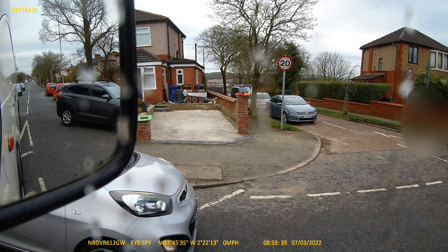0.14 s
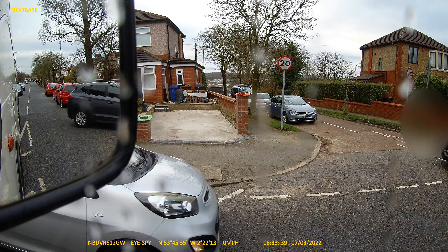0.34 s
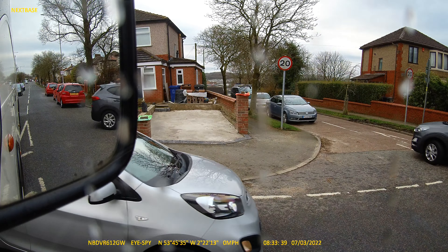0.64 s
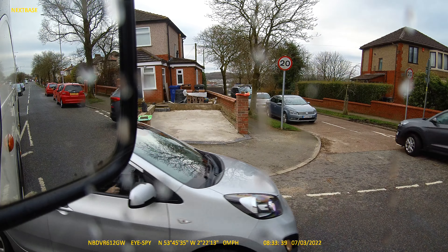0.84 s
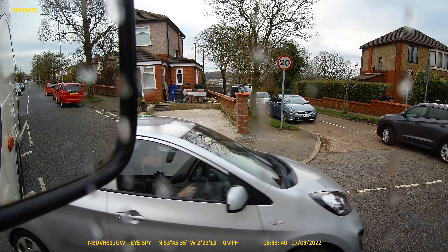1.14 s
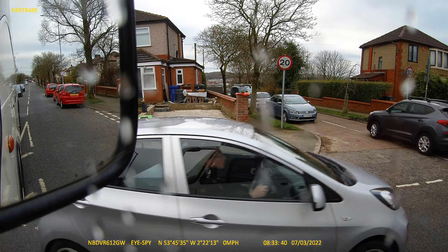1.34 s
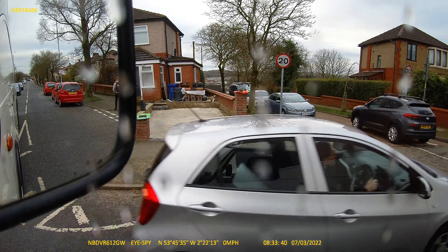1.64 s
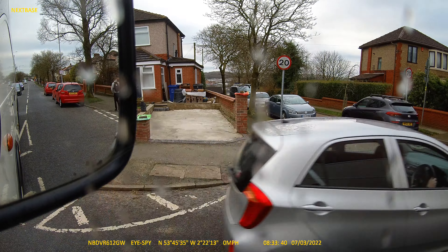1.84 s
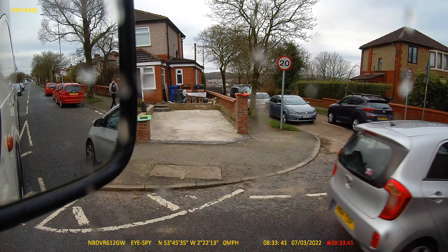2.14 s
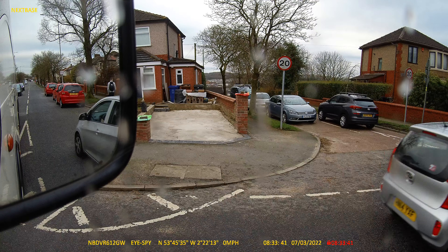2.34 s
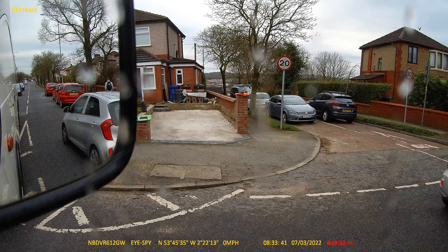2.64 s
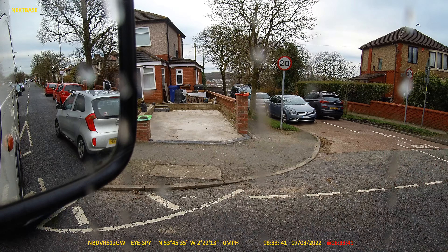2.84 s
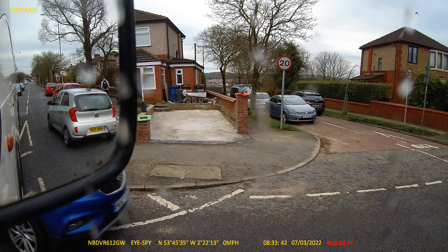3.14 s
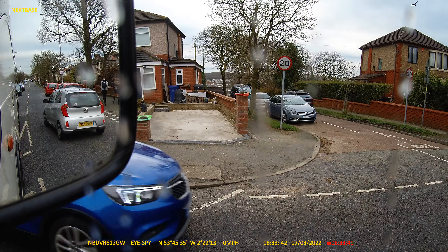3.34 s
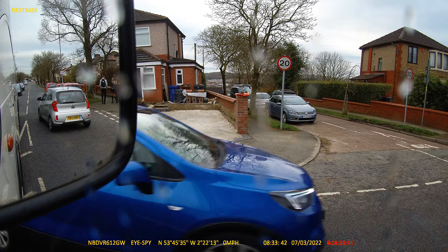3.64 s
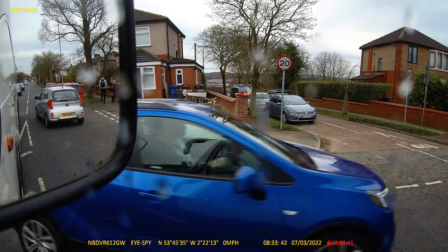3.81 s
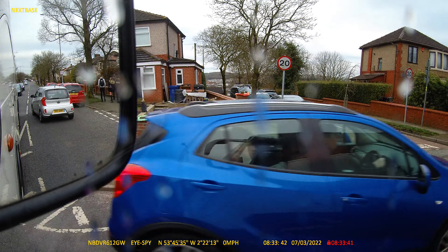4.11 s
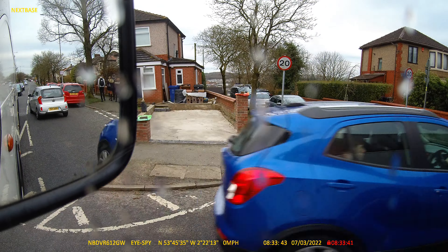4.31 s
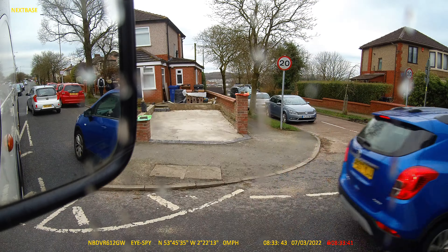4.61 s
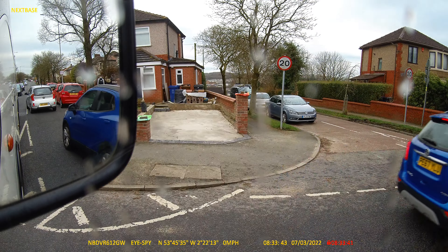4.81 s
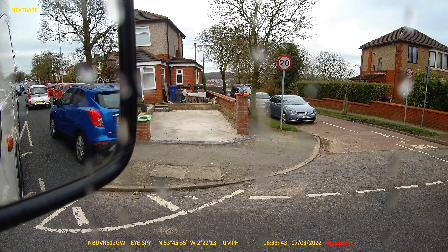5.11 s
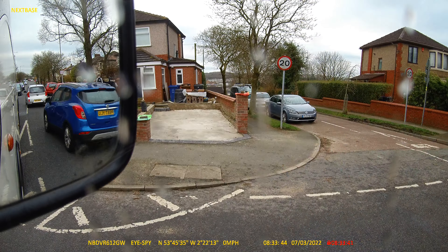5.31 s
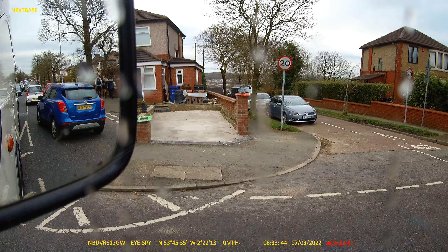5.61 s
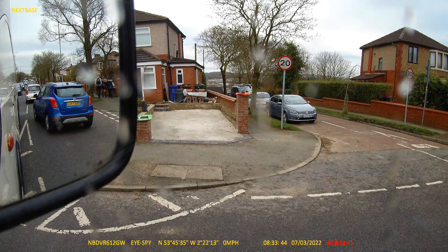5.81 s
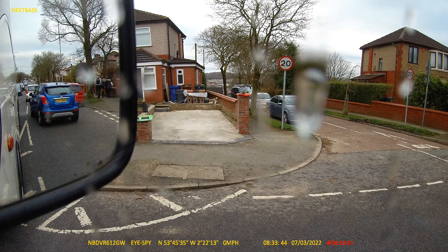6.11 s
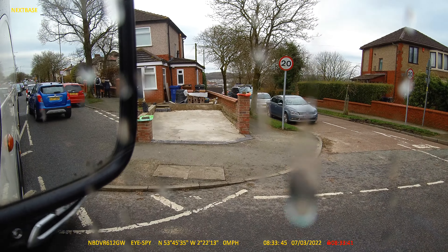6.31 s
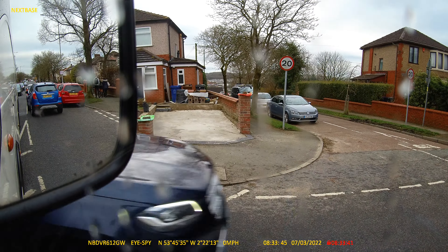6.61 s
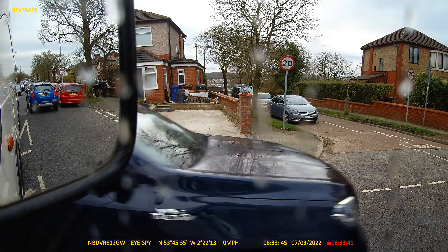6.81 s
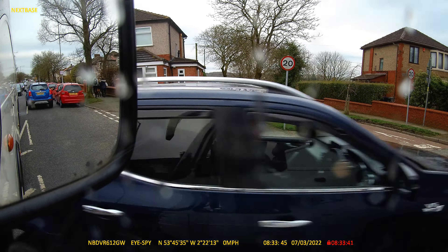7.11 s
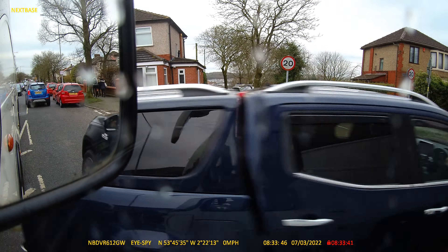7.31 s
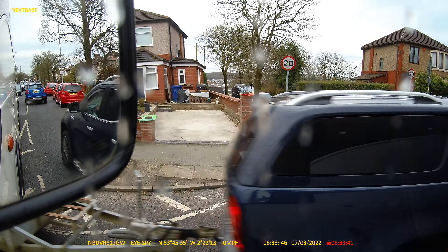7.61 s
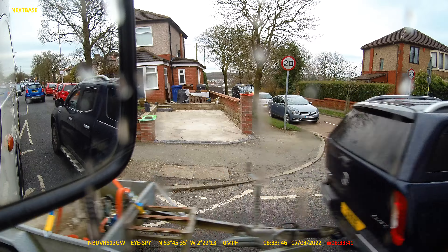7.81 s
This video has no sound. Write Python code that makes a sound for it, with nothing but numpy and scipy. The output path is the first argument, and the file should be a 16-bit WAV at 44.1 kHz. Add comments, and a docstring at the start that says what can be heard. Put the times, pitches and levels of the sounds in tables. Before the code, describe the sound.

Mono sound from a windscreen microphone inside a large diesel coach waiting at a junction. Throughout, a deep boom near 30 Hz and its 60 Hz overtone dominate, with unsteady low body shudder, a weaker hum around 330 Hz, and much quieter heater-blower rush, fine vent hiss and a faint wavering whistle near 1400 Hz. Tiny trim ticks fall at about 1.0 and 1.5 s, with a duller knock at 1.7 s. From 2.5 to 3.1 s a car's low exhaust hum glides upward and fades. At 4.7 s load comes on: the engine sags to about 28 Hz by 5.5 s, booming louder, and loose trim buzzes faintly around 5.75 s. It recovers after 6 s, overshoots to nearly 33 Hz at 7.3 s while the boom softens, then settles slightly above idle and strengthens. Around 7.6 s another car hums faintly, a rolling trailer swells the low noise, and one tiny rising squeak sounds.

```python
"""Idling diesel coach cab

Inside a large six-cylinder coach at a junction: multiples of the firing rate boom over noise-band body shudder;
the speed sags under load, recovers and overshoots. Heater-blower noise rushes through cab resonances, with a
faint sine whistle. Cars hum past as gliding sines and a trailer squeaks. Trim ticks ring damped panel modes;
trim also buzzes once a firing while the engine labours."""
import sys
import numpy as np
from scipy import signal
from scipy.fft import rfft, irfft, next_fast_len
from scipy.io import wavfile
from scipy.ndimage import uniform_filter1d, map_coordinates

SR = 44100
rng = np.random.default_rng(int(sys.argv[2]) if len(sys.argv) > 2 else 0)


def volts(x):
    """Linear amplitude factor 10**(x/20) for a level x in dB, scalar or array-like."""
    e = np.asarray(x, float) / 20
    return 10 ** e


def output_pcm(signal):
    """Save a mono or channel-first signal as 16-bit PCM at the path in sys.argv[1].

    Samples are clipped to [-1, 1] before scaling.
    """
    pcm = np.clip(np.atleast_2d(signal).T, -1, 1) * 32767
    wavfile.write(sys.argv[1], SR, np.round(pcm).astype(np.int16))


N = 350595

# engine speed: t/s, firing rate/Hz
SPEED = [(0.0, 29.99), (4.0, 29.955), (4.5, 30.02), (4.9, 29.6), (5.2, 28.38), (5.5, 27.97), (5.8, 28.13),
         (6.1, 29.36), (6.4, 29.58), (6.7, 30.36), (7.0, 30.95), (7.3, 32.69), (7.6, 31.13), (7.95, 31.07)]
# firing tone, louder in labour, softer in overrun: t/s, rms level/dB
FIRING = [(0, -22), (.6, -23.5), (3.2, -23.5), (4.3, -22.5), (5.3, -20), (6.35, -20.3), (6.8, -24),
          (7.48, -29.5), (7.85, -23)]
# upper tones, third row a belt-driven pump: multiple of firing rate, lag/cycles of it, unsteadiness/dB
MULTIPLES = [(2, .13, 1), (3, 0, 2), (3.91, 0, 3)]
# same rows: rms level at rest/dB, gain under load/dB, loss per Hz of speed sag/dB
MULTIPLE_LEVELS = [(-35, 2.5, 2), (-53.5, 6.5, 1), (-49.5, 7.5, 1)]
# body shudder spectrum: f/Hz, relative level per Hz/dB
SHUDDER = [(6, -14), (12, -26), (20, -21), (38, -3), (50, 1), (62, -0.5), (73, 1), (80, -2.5), (86, -8),
           (100, -22), (130, -25)]
# trailer rolling close by: t/s, half-length/s, road-noise swell/dB, shudder swell/dB
TRAILER = (7.68, 0.21, 4, 3.5)
# cab resonances: f/Hz, width/Hz, level per Hz/dB
CAB = [(94, 20, -60), (117.4, 25, -57), (153.2, 33, -57), (176.4, 32, -59), (215.9, 34.7, -55),
       (272, 36, -57.5), (294.5, 47, -57), (343, 43, -70), (366, 23, -65), (418.4, 50, -61),
       (461.6, 25, -59.5), (498, 22, -68.5), (526.3, 38, -63.5), (554, 34.4, -63.5), (587, 16, -73.5),
       (620.7, 44, -68), (645, 48, -71), (724, 69, -75), (781.6, 45, -67), (822, 45, -70), (869.5, 21, -73),
       (903, 27, -76.5), (948, 29, -77), (992, 55, -75.5), (1050, 54, -81.5)]
# windscreen and dashboard resonances: f/Hz, width/Hz, level per Hz/dB
DASH = [(1090, 100, -81), (1148, 44, -74.5), (1226, 88, -79), (1250, 32, -74), (1307, 20, -81),
        (1349, 29, -73), (1387.4, 46, -66), (1423, 44, -71), (1468, 28, -70.5), (1503, 44, -77.5),
        (1533, 27, -74.5), (1584, 42, -82.5), (1610, 25, -79.5), (1663, 37, -86), (1716, 93, -85),
        (1763, 78, -81.5), (1835, 70, -82.5), (1900, 120, -88.5), (2016, 54, -88.5), (2063, 30, -90.5),
        (2116, 31, -88), (2190, 67, -90.5), (2290, 43, -93.5), (2352, 25, -89), (2397, 25, -92),
        (2470, 37, -96), (2550, 36, -84), (2603, 40, -87)]
# vent duct resonances: f/Hz, width/Hz, level per Hz before ripple/dB
VENT = [(2697, 43, -83.5), (2840, 260, -89.5), (3130, 210, -91.5), (3260, 72, -89), (3427, 160, -92.5),
        (3560, 257, -99.5), (3780, 190, -93), (3870, 299, -100), (3970, 210, -96), (4160, 89, -91.5),
        (4290, 120, -93.5), (4500, 142, -99), (4614, 78, -89.5), (4680, 52, -91), (4850, 190, -93),
        (4995, 105, -94), (5050, 61, -94), (5170, 85, -91.5), (5320, 200, -95), (5532, 57, -99),
        (5680, 262, -93.5), (5900, 98, -101), (6050, 170, -96), (6240, 67, -92), (6430, 269, -98),
        (6542, 37, -90.5), (6670, 160, -91.5), (6830, 71, -98.5), (6960, 198, -99)]
# vent grille resonances: f/Hz, width/Hz, level per Hz before ripple/dB
GRILLE = [(7460, 790, -101), (7970, 238, -103), (8230, 240, -97), (8521, 129, -102), (8757, 70, -103),
          (9105, 650, -102), (9899, 120, -101), (10100, 160, -101), (10840, 620, -106), (11504, 66, -106),
          (11700, 76, -105), (12600, 370, -104), (12851, 301, -107), (14368, 198, -108)]
# trim panel modes: f/Hz, t60/s, relative level/dB
TRIM_MODES = [(1950, .01, 0), (2350, .007, -3), (3200, .004, -7), (4600, .008, 0), (5600, .004, -5),
              (6600, .005, -2), (8000, .005, 0), (9800, .004, 0), (11500, .003, -2), (13500, .003, -3)]
# trim ticks: t/s, nominal level of strongest mode/dB, centre f/Hz, spread/octaves
TICKS = [(.960, -43, 8500, .55), (.964, -44, 9500, .6), (.9868, -41, 6500, .6), (1.4625, -41, 8800, 1.2),
         (1.510, -33, 3200, 1.05), (1.7012, -30, 2050, .22)]
# exhaust hum of cars pulling away alongside: start t/s, length/s, from f/Hz, to f/Hz, rms level before fade/dB
CARS = [(2.54, .58, 60.5, 72, -26), (7.6, .7, 70.5, 73.5, -31)]
# trim buzz: peak t/s, half-length/s, nominal level of its bright clicks/dB
BUZZ = (5.75, .26, -50)
# trailer squeak: start t/s, length/s, from f/Hz, to f/Hz, rms level/dB
SQUEAK = (7.56, .1, 1900, 2850, -65.5)

IDLE_HZ = 30  # firing rate at rest
FIRST_TURN_CYCLES = .19  # part of a firing cycle done at the start
LOAD_S, LOAD_RISE_S = 4.7, .27  # load comes on and stays
LAG_CYCLES_PER_HZ = .2  # lag per Hz away from idle
MESH_MULTIPLE, PANEL_HZ, PANEL_WIDTH_HZ = 11, 330, 5.4
MESH_DB, MESH_LOAD_DB = -43, -1
SHUDDER_DB, SHUDDER_DRIFT_DB = -35.5, 2.3
CAB_SPLIT_HZ = 420
FIZZ_DB_PER_HZ, FIZZ_FROM_HZ, RIPPLE_DB = -104.5, 2000, 1.7
WHISTLE_HZ, WHISTLE_HZ_PER_HZ, WHISTLE_DB = 1396, 4, -54
CAR_ATTACK_S, CAR_RELEASE_S, CAR_FADE_DB = .07, .1, 5
TOP_HZ = 15060


def unit(x):
    """Scale to rms 1."""
    return x / np.sqrt(np.mean(x ** 2))


def curves(rows):
    """Per-sample interpolation of each column after the time."""
    s, *columns = np.transpose(rows)
    return [np.interp(np.arange(N) / SR, s, column) for column in columns]


def wobble(knots_per_s):
    """Smooth random curve through normal knots."""
    knots = rng.standard_normal(int(N * knots_per_s / SR) + 4)
    return map_coordinates(knots, [np.arange(N) * knots_per_s / SR])


def bell(centre_s, half_s):
    """Squared distance from a moment, in half-lengths."""
    return ((np.arange(N) / SR - centre_s) / half_s) ** 2


def noise(gain):
    """Gaussian noise of power gain(hz) squared per Hz."""
    m = next_fast_len(N + 8192)
    spectrum = rfft(rng.standard_normal(m)) * gain(np.fft.rfftfreq(m, 1 / SR))
    return irfft(spectrum, m)[:N] * np.sqrt(SR / 2)


def resonant(modes, hz):
    """Gain of steep resonances, each applied twice, added as powers."""
    power = 0
    for centre, width, db in modes:
        damping = (hz * width) ** 2
        power = power + (volts(db) * damping / ((centre * centre - hz * hz) ** 2 + damping)) ** 2
    return np.sqrt(power)


def sine(cycles, db):
    """Sine of rms level db on a phase curve."""
    return np.sqrt(2) * volts(db) * np.cos(2 * np.pi * cycles)


def tone(hz, db):
    """Sine of rms level db on a pitch curve."""
    return sine(np.cumsum(hz) / SR, db)


def glide(start, length, from_hz, to_hz, db, attack, release, fade_db=0):
    """Pitch and level of a note that slides while it swells, holds and fades."""
    t = np.arange(N) / SR - start
    shape = np.clip(np.minimum(t / attack, (length - t) / release), 1e-5, 1)
    done = np.clip(t / length, 0, 1)
    return from_hz + (to_hz - from_hz) * done, db - fade_db * done + 20 * np.log10(shape)


def click(centre_hz, octaves):
    """Damped panel modes near a centre; harder ticks reach more octaves, duller ones start softer."""
    t = np.arange(SR // 50) / SR
    ring = np.zeros(len(t))
    for hz, t60, db in TRIM_MODES:
        reach_db = -6 * (np.log2(hz / centre_hz) / octaves) ** 2
        decay_db = db + reach_db + rng.standard_normal() - 60 * t / t60
        ring += volts(decay_db) * np.sin(2 * np.pi * (hz * t + rng.random()))
    return (1 - np.exp(-t * centre_hz)) * ring


def load_curve():
    """Engine load, 0 to 1."""
    return curves([(LOAD_S, 0), (LOAD_S + LOAD_RISE_S, 1)])[0]


def trailer_gain(swell_db, drift_db):
    """Gain swelling as the trailer passes, with slow drift."""
    return volts(swell_db * np.exp(-bell(*TRAILER[:2])) + drift_db)


def firing_tones(turns, speed):
    """Firing boom and its multiples, phase-locked to the engine; load and sag set the balance."""
    load = load_curve()
    sag_hz = np.clip(IDLE_HZ - speed, 0, None)
    speed_lag = LAG_CYCLES_PER_HZ * abs(speed - IDLE_HZ)
    out = sine(turns, curves(FIRING)[0] + .5 * wobble(7))
    for (multiple, lag, rough_db), (rest_db, gain_db, loss_db) in zip(MULTIPLES, MULTIPLE_LEVELS):
        db = rest_db + gain_db * load - loss_db * sag_hz + rough_db * wobble(5)
        out += sine(multiple * turns - lag - speed_lag, db)
    return out


def gear_mesh(turns, speed):
    """Gear-mesh tone, loud only near a panel resonance."""
    near_db = -6 * ((MESH_MULTIPLE * speed - PANEL_HZ) / PANEL_WIDTH_HZ) ** 2
    wander_cycles = .35 * wobble(1.6)
    db = MESH_DB + MESH_LOAD_DB * load_curve() + near_db + .51 * wobble(7)
    return sine(MESH_MULTIPLE * turns - wander_cycles, db)


def body_shudder():
    """Low noise under and between the firing tones; swells as the trailer passes."""
    f, level_db = np.transpose(SHUDDER)
    gain = lambda hz: volts(np.interp(np.log(hz + 1), np.log(f + 1), level_db, -90, -90))
    drift_db = SHUDDER_DRIFT_DB * wobble(2.04)
    return volts(SHUDDER_DB) * trailer_gain(TRAILER[3], drift_db) * unit(noise(gain))


def cab_rush():
    """Air rush coloured by cab and dashboard; only the low part swells with the trailer."""
    low = noise(lambda hz: resonant(CAB, hz) * (hz < CAB_SPLIT_HZ))
    mid = noise(lambda hz: resonant(CAB + DASH, hz) * (hz >= CAB_SPLIT_HZ))
    return low * trailer_gain(TRAILER[2], .53 * wobble(1.96)) + mid


def vent_jets():
    """Air-jet fizz and vent resonances; many small panel modes ripple the spectrum."""
    ripple = rng.standard_normal(SR // 2)  # one value per Hz
    for _ in range(2):
        ripple = uniform_filter1d(ripple, size=30)
    ripple = unit(ripple)

    def gain(hz):
        jets = np.hypot(resonant(VENT + GRILLE, hz), volts(FIZZ_DB_PER_HZ) * (hz > FIZZ_FROM_HZ))
        return jets * volts(RIPPLE_DB * np.interp(hz, np.arange(SR // 2), ripple))
    return noise(gain)


def blower_whistle(speed):
    """Unsteady blower sine; the blower slows a little with the engine."""
    follow_hz = WHISTLE_HZ_PER_HZ * np.minimum(speed - IDLE_HZ, .5)
    return tone(WHISTLE_HZ + follow_hz + 2.66 * wobble(10), WHISTLE_DB + 2.2 * wobble(16))


def trim_ticks():
    """Single ticks ring the trim panel."""
    out = np.zeros(N + SR)
    for s, db, hz, octaves in TICKS:
        out[round(s * SR):][:SR // 50] += volts(db) * click(hz, octaves)
    return out[:N]


def car_hums():
    """Exhaust notes glide up and fade as cars pull away."""
    out = np.zeros(N)
    for car in CARS:
        hz, db = glide(*car, CAR_ATTACK_S, CAR_RELEASE_S, CAR_FADE_DB)
        out += tone(hz, db + wobble(8))
    return out


def trim_buzz(turns):
    """Loose trim struck at the same point of every firing cycle: a bright and a dull click together."""
    out = np.zeros(N + SR)
    buzz_db = BUZZ[2] - 6 * bell(*BUZZ[:2])
    for i in np.flatnonzero(np.diff(np.floor(turns - .78))):
        strike = click(8000, octaves=.8) + volts(8) * click(2050, octaves=.25)
        out[i:][:SR // 50] += volts(buzz_db[i] + rng.normal(0, 1.5)) * strike
    return out[:N]


def trailer_squeak():
    """Trailer spring squeaks once: a rising sine, rough in pitch and level."""
    hz, db = glide(*SQUEAK, attack=.025, release=.025)
    return tone(hz + 160 * wobble(400), db + 5 * wobble(200))


def scene():
    """Sum of all sources at one microphone on the windscreen."""
    speed = curves(SPEED)[0]
    turns = FIRST_TURN_CYCLES + np.cumsum(speed) / SR  # firing cycles
    engine = firing_tones(turns, speed) + gear_mesh(turns, speed) + body_shudder()
    blower = cab_rush() + vent_jets() + blower_whistle(speed)
    trim = trim_ticks() + trim_buzz(turns)
    traffic = car_hums() + trailer_squeak()
    return (engine + blower + trim + traffic)[None]


def roll_off(x):
    """The treble ends steeply here."""
    return signal.sosfilt(signal.butter(12, 15760, fs=SR, output="sos"), x)


def record(dry):
    """Linear-phase low-pass at TOP_HZ; odd reflection pads the ends."""
    taps = signal.firwin(501, TOP_HZ, fs=SR)
    wide = np.pad(dry, ((0, 0), (250, 250)), "reflect", reflect_type="odd")
    mix = signal.fftconvolve(wide, taps[None], "valid")
    return roll_off(mix)


dry = scene()
out = record(dry)
output_pcm(out)
```